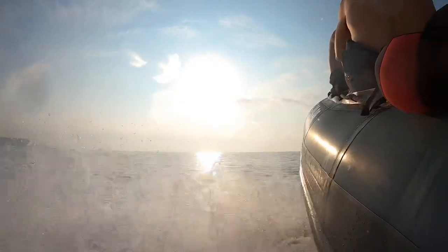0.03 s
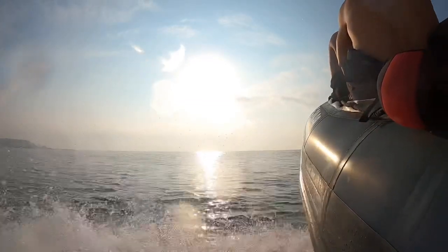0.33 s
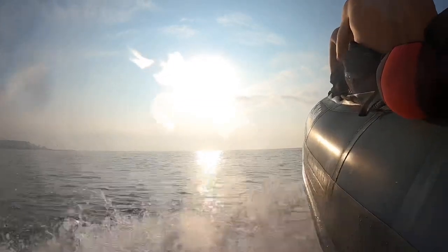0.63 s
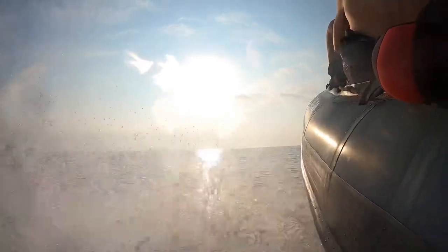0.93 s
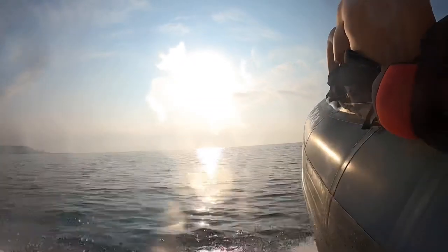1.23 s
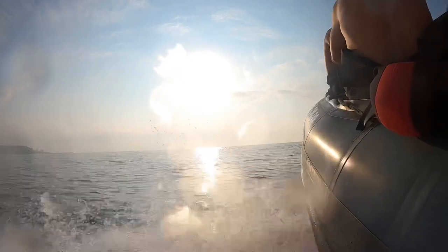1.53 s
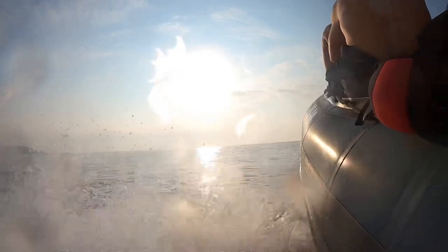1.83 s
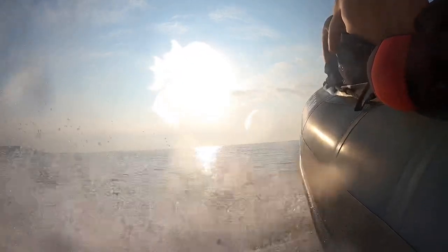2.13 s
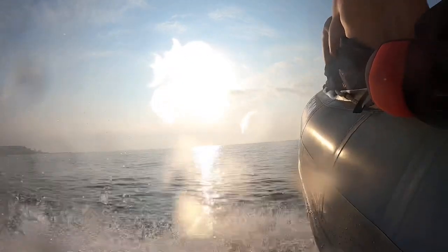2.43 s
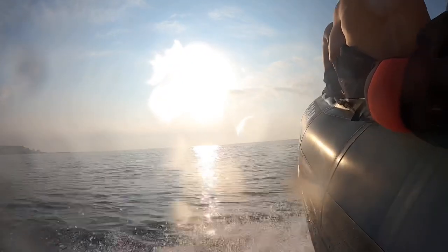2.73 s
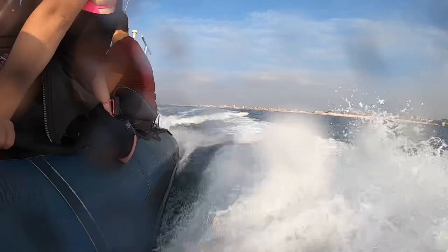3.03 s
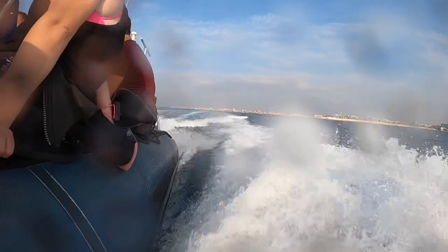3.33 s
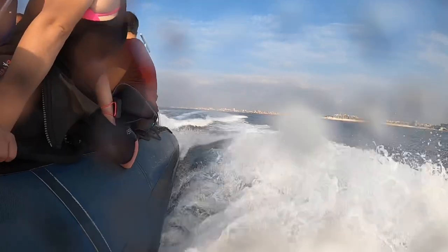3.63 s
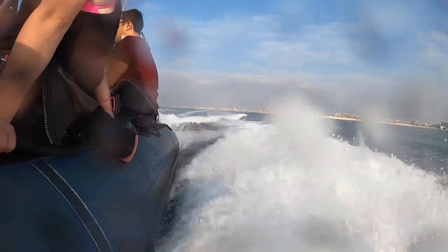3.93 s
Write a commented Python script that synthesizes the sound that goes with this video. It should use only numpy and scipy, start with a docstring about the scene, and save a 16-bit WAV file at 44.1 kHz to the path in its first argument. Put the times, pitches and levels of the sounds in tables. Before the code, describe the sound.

An inflatable motorboat speeds over choppy sea with booming hull, rushing water, spray and wind.

```python
"""Motorboat on a choppy sea

An inflatable boat planes over the chop, heard from a waterproof case low on its side. The hull booms
and hums and wind buffets over a low engine drone. The wash gurgles in the resonances of the case,
spray hisses, and slaps and drops strike it. A brief fade parts the view ahead from the louder one astern."""
import sys
import numpy as np
from scipy import signal
from scipy.fft import rfft, irfft, next_fast_len
from scipy.io import wavfile
from scipy.ndimage import uniform_filter1d, map_coordinates

SR = 44100
rng = np.random.default_rng(int(sys.argv[2]) if len(sys.argv) > 2 else 0)


def bounce(signal):
    """Save signal as a 16-bit WAV file at the path given by the first command-line argument."""
    frames = np.transpose(np.atleast_2d(signal))
    limited = np.clip(frames, -1, 1)
    pcm = np.round(limited * 32767).astype(np.int16)
    wavfile.write(sys.argv[1], SR, pcm)


N = 176400
TIME_S = np.arange(N) / SR
TURN_S = 3.16  # the view turns from ahead to astern


def amp(db):
    """Amplitude ratio of a level in decibels."""
    return 10 ** (np.asarray(db) / 20)

def unit(x):
    """Normalisation to rms 1."""
    return x / np.sqrt(np.mean(x ** 2) + 1e-20)

def curves(table):
    """Linear interpolation in time: one curve for each column after the first."""
    times, *columns = np.transpose(table)
    return [np.interp(TIME_S, times, column) for column in columns]

def by_view(ahead, astern):
    """A step from the first value to the second at the turn."""
    return np.where(TIME_S < TURN_S, ahead, astern)

def wobble(rate_hz):
    """Smooth random modulation: a spline through Gaussian values."""
    knots = rng.standard_normal(int(N * rate_hz / SR) + 4)
    return map_coordinates(knots, [np.arange(N) * rate_hz / SR])

def filtered(x, response):
    """Linear filtering: the spectrum times a frequency response."""
    size = next_fast_len(N + SR // 2)
    return irfft(rfft(x, size) * response(np.fft.rfftfreq(size, 1 / SR)), size)[..., :N]

def shaped(x, spectrum):
    """Spectral shaping by (frequency_hz, gain_db) points joined on a log frequency axis."""
    hz, db = np.transpose(spectrum)
    return filtered(x, lambda f: amp(np.interp(np.log(f + 1), np.log(hz + 1), db)))

def resonance(f, hz, width_hz):
    """Frequency response of a damped oscillator."""
    return 1j * f * width_hz / (hz * hz - f * f + 1j * f * width_hz)

def stereo(mid, side):
    """Sum and difference: left and right from mid and side."""
    return np.array([mid + side, mid - side])

def patter(per_s, spread_db=3.5):
    """Shot noise: independent impacts of uneven size, at rms 1."""
    chance, size, push = rng.random(N), rng.standard_normal(N), rng.choice([-1, 1], N)
    return unit((chance < per_s / SR) * push * amp(spread_db * np.clip(size, -2, 2)))

def rumble(spectrum, evenness, span_s):
    """Narrowband noise swells by chance; dividing by a power of its envelope partly evens it."""
    noise = unit(shaped(rng.standard_normal(N), spectrum))
    power = uniform_filter1d(np.abs(signal.hilbert(noise)) ** 2, int(span_s * SR) + 1)
    return unit(noise / (np.abs(power) + 0.01) ** (evenness / 2))


# Envelope of the boom: time_s, level_db
BOOM_ENVELOPE = [(0.0, -29), (0.04, -16), (0.15, -16.5), (0.19, -25), (0.31, -22), (0.39, -24.0),
                 (0.45, -21.5), (0.61, -22.5), (0.66, -18.5), (0.69, -25), (0.84, -19), (1.06, -26),
                 (1.15, -18.5), (1.24, -16), (1.27, -23.5), (1.52, -15), (1.58, -24), (1.66, -21.5),
                 (1.89, -27), (1.97, -18.5), (2.05, -24), (2.09, -19), (2.23, -29), (2.27, -26.5),
                 (2.38, -25), (2.42, -20), (2.49, -22), (2.55, -16), (2.6, -19), (2.67, -21), (2.71, -21.5),
                 (2.77, -23), (2.85, -12.5), (3.04, -25), (3.3, -21.5), (3.33, -34.5), (3.38, -17.5),
                 (3.43, -24.5), (3.51, -19.5), (3.69, -16.5), (3.73, -21.5), (3.8, -25), (3.85, -14.5),
                 (3.94, -24.5), (4.0, -14.5)]
# Spectrum of the boom ahead: frequency_hz, gain_db
BOOM_SPECTRUM = [(10, -58), (45, -9.5), (53, 1), (76, -2.5), (90, -10.5), (122, -13.5), (150, -22),
                 (260, -62), (800, -140)]
# Hum within the boom: time_s, pitch_hz
HUM_PITCH = [(0.1, 64.76), (0.45, 57.02), (0.85, 69.93), (1.2, 53.9), (1.45, 61.93), (2.0, 60.02),
             (2.9, 63.07), (3.3, 62.9), (3.55, 71.95), (4.0, 71.15)]

def hull():
    """Forced vibration: chop and wind make hull and case boom, with a wavering hum."""
    boom_db, = curves(BOOM_ENVELOPE)
    hum_hz, = curves(HUM_PITCH)
    spectra = BOOM_SPECTRUM, [(hz * 1.14, db) for hz, db in BOOM_SPECTRUM]  # higher astern
    noise = by_view(*[rumble(spectrum, evenness=0.71, span_s=0.069) for spectrum in spectra])
    hum = np.sqrt(2) * np.sin(2 * np.pi * np.cumsum(hum_hz) / SR + 0.53 * wobble(14))
    return amp(boom_db) * (amp(-1.2) * noise + amp(-3) * hum)


# Envelope of the buffeting: time_s, level_db
WIND_ENVELOPE = [(0.0, -26), (0.12, -30), (0.64, -35), (0.75, -20), (1.12, -24), (1.33, -22), (1.48, -31),
                 (1.58, -20), (1.85, -30), (2.04, -25), (2.3, -20), (2.41, -32), (2.68, -20.5),
                 (3.3, -26.5), (3.54, -23.5), (3.67, -45), (3.8, -19), (4.0, -40)]
# Spectrum of the buffeting: frequency_hz, gain_db
WIND_SPECTRUM = [(3, -31), (22, 0.5), (36, 12), (46, 10), (70, -39), (300, -140)]

def wind():
    """Turbulence: the wind's pressure fluctuations are heard as deep buffeting."""
    level_db, = curves(WIND_ENVELOPE)
    return amp(level_db - 1.8) * rumble(WIND_SPECTRUM, evenness=0.51, span_s=0.071)


# Engine harmonics: order, ahead_db, astern_db
ENGINE_ORDERS = [(1, -28.5, -45), (4, -46.5, -38.5)]

def engine(fundamental_hz=38.77):
    """Periodic motion: a motor at steady full speed sounds at multiples of its fundamental."""
    phase = 2 * np.pi * np.cumsum(fundamental_hz * (1 + 0.005 * wobble(4.2))) / SR
    drone = np.zeros(N)
    for order, ahead_db, astern_db in ENGINE_ORDERS:
        level_db = by_view(ahead_db, astern_db) + 0.5 * wobble(5.62)
        drone += amp(level_db) * np.sqrt(2) * np.sin(order * phase + rng.uniform(0, 2 * np.pi))
    return drone


# Envelope of the water rushing off the tube: time_s, level_db
WASH_ENVELOPE = [(0.0, -27.5), (0.24, -31), (0.27, -28), (0.44, -29), (0.52, -26), (0.68, -25.5),
                 (0.76, -28.5), (0.8, -25.5), (0.83, -28.5), (0.92, -25), (1.06, -28), (1.17, -25.5),
                 (1.31, -25.5), (1.35, -23.0), (1.5, -29.5), (1.53, -25), (1.58, -26.5), (1.84, -30),
                 (1.95, -27.5), (2.01, -22.5), (2.29, -25.5), (2.41, -23), (2.53, -27.5), (2.83, -23.0),
                 (3.04, -29), (3.3, -29.5), (3.42, -20), (3.55, -21.5), (3.8, -23), (4.0, -24.0)]
# Spectrum of the rush: frequency_hz, gain_db
WASH_SPECTRUM = [(20, -36), (150, -2.5), (300, -4), (450, -6), (600, -8.7), (740, -8.5), (880, -4),
                 (970, -6.5), (1080, -1.5), (1190, -2), (1300, -9), (1420, -11.5), (1600, -12.5),
                 (1850, -25.5), (2600, -54.5), (6000, -120)]
# Modes of the case: pitch_hz, bandwidth_hz, gain_db
CASE_MODES = [(898, 75, -4.5), (1186, 75, 3)]

def wash():
    """Modal excitation: churning water rushes, and its splashes ring the case, more clearly ahead."""
    def case_response(f):
        modes = sum(amp(db) * resonance(f, hz, width_hz) for hz, width_hz, db in CASE_MODES)
        return modes / (1 + (f / 1700) ** 8)

    level_db, = curves(WASH_ENVELOPE)
    churn_db = 0.97 * wobble(35) + 0.9 * wobble(130)
    rush = unit(shaped(rng.standard_normal(N) + 0.56 * patter(per_s=1200), WASH_SPECTRUM))
    ring = unit(filtered(patter(per_s=900), case_response))
    rush_db = by_view(-1.2, -0.24)
    ring_db = by_view(-5.5, -10) + wobble(11)
    return amp(level_db + churn_db) * (amp(rush_db) * rush + amp(ring_db) * ring)


# Envelopes of spray and mist: time_s, spray_db, mist_db
SPRAY_ENVELOPES = [(0.0, -43, -67), (0.17, -46.0, -67.5), (0.36, -46.5, -65.5), (0.62, -41.0, -62.5),
                   (0.72, -45.5, -67.0), (0.9, -46.0, -67.5), (1.1, -44.0, -63), (1.18, -38, -57.5),
                   (1.41, -42.5, -64.5), (1.75, -45.5, -67), (2.03, -40, -60), (2.19, -40, -59.5),
                   (2.24, -43, -65), (2.39, -40, -60), (2.83, -38.5, -61.5), (3.04, -44, -65.5),
                   (3.3, -45, -71.5), (3.36, -38, -64), (3.5, -36.5, -59), (3.9, -39, -62)]
# Spectrum of the sheets of spray: frequency_hz, gain_db
SPRAY_SPECTRUM = [(300, -48), (1800, 1.5), (2350, 2.5), (2680, -1.5), (3050, 2.5), (3450, -3), (3750, -2),
                  (4080, -6), (4350, -1.5), (4650, -4.5), (5100, -5.5), (5950, -13.5), (6550, -10.5),
                  (7300, -19), (8000, -30), (14000, -99.5)]
# Spectrum of the fine mist: frequency_hz, gain_db
MIST_SPECTRUM = [(3000, -46), (8000, -7), (9200, -1.5), (11200, -9.5), (12200, -6), (14400, -15.5),
                 (15300, -36)]
# Case modes rung by jets of spray: centre_s, half_length_s, pitch_hz, bandwidth_hz, gain_db
JET_MODES = [(2.648, 0.3, 3030, 220, -8), (2.65, .3, 4340, 200, -12), (3.563, 0.17, 4590, 380, -7.5)]
# Filter on spray and mist astern: frequency_hz, gain_db
ASTERN_RESPONSE = [(1500, 0.5), (3300, 1), (6200, -1), (7200, -2.5), (8000, -2.5), (11200, -2),
                   (12300, -9.5), (14500, -10)]

def spray():
    """Superposed impacts: countless droplets on the case merge into hiss, with mist sizzling above."""
    def grains():
        return rng.standard_normal(N) + 0.5 * patter(per_s=1100) + 0.26 * patter(per_s=60, spread_db=4)

    def hiss(spectrum):
        return stereo(unit(shaped(grains(), spectrum)), unit(shaped(grains(), spectrum)))

    spray_db, mist_db = curves(SPRAY_ENVELOPES)
    flutter_db = 0.5 * wobble(40) + 0.61 * wobble(160)
    ring = np.zeros(N)
    for centre_s, half_length_s, hz, width_hz, db in JET_MODES:
        swell = np.exp(-((TIME_S - centre_s) / half_length_s) ** 2)
        ring += amp(db) * swell * unit(filtered(grains(), lambda f: resonance(f, hz, width_hz) ** 2))
    sheets = amp(spray_db + flutter_db) * (amp(1.05) * hiss(SPRAY_SPECTRUM) + ring)
    mist = amp(mist_db + flutter_db) * hiss(MIST_SPECTRUM)
    return by_view(sheets + mist, shaped(sheets + mist, ASTERN_RESPONSE))


def strikes(rows, t60_s, log_width, attack_s=0.0005):
    """Damped ringing: each blow is a band of noise about its pitch, decaying exponentially."""
    out, t = np.zeros(N + SR), np.arange(SR // 8) / SR
    f = np.fft.rfftfreq(len(t), 1 / SR)
    envelope = (1 - np.exp(-t / attack_s)) * 10 ** (-3 * t / t60_s)
    for start_s, peak_db, pitch_hz in rows:
        band = np.exp(-(np.log((f + 1) / pitch_hz) / log_width) ** 2)
        blow = envelope * irfft(rfft(rng.standard_normal(len(t))) * band, len(t))
        out[round(start_s * SR):][:len(t)] += amp(peak_db) * blow / np.abs(blow).max()
    return out[:N]


# Slaps of water: start_s, relative_peak_db, pitch_hz
WATER_SLAPS = [(.342, -20, 1098), (.675, -22, 701), (.9, -17, 885), (1.345, -17, 1150), (1.537, -10, 1120),
               (2.425, -15.5, 1190), (2.476, -9.5, 1230), (2.88, -14, 1190), (3.323, -15.5, 1190)]

def slaps():
    """Impulse response: each slap of water leaves the case ringing briefly and roughly."""
    return amp(-1) * strikes(WATER_SLAPS, t60_s=0.036, log_width=0.12)


# Single drops: start_s, relative_peak_db, pitch_hz
DROP_IMPACTS = [(.404, -27, 2950), (.542, -26.5, 3300), (.776, -33.5, 5200), (1.496, -24, 4600),
                (1.575, -34, 5998), (2.165, -29, 5600), (2.237, -24.5, 4203), (3.323, -28, 3603),
                (3.611, -19.5, 3008)]

def drops(cutoff_hz=7000):
    """Transmission loss: drops tick on the case, whose wall muffles their highest frequencies."""
    ticks = amp(1) * strikes(DROP_IMPACTS, t60_s=0.011, log_width=0.36)
    return filtered(ticks, lambda f: 1 / (1 + (f / cutoff_hz) ** 10))


def scene():
    """Superposition: the sound pressures of boat, wind and water add."""
    return hull() + wind() + engine() + wash() + spray() + slaps() + drops()


# Fade between the two views: time_s, gain_ratio
VIEW_FADE = [(3.03, 0.92), (3.058, 0.32), (3.072, 0), (3.255, 0), (3.28, 0.26), (3.3, 0.96)]
# Stereo width below the split, near mono except for one brief opening: time_s, side_ratio
STEREO_WIDTH = [(2.0, 0.00071), (2.4, 0.11), (2.8, 0.3), (3.1, 0.38), (3.2, 0.0014)]

def record(dry, split_hz=11700, cutoff_hz=15400):
    """Mid-side scaling narrows the image; a fade parts the views and a low-pass limits the band."""
    gain, = curves(VIEW_FADE)
    width, = curves(STEREO_WIDTH)
    mid, side = stereo(*dry) / 2
    top = filtered(side, lambda f: f > split_hz)  # wide ahead, mono astern
    narrowed = stereo(mid, width * (side - top) + by_view(0.8, 0) * top)
    low_pass = signal.butter(24, cutoff_hz, fs=SR, output="sos")
    return signal.sosfiltfilt(low_pass, narrowed * gain, padlen=SR // 10)


dry = scene()
out = record(dry)
bounce(out)
```